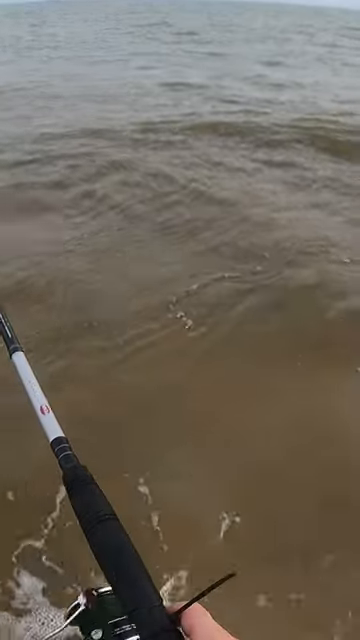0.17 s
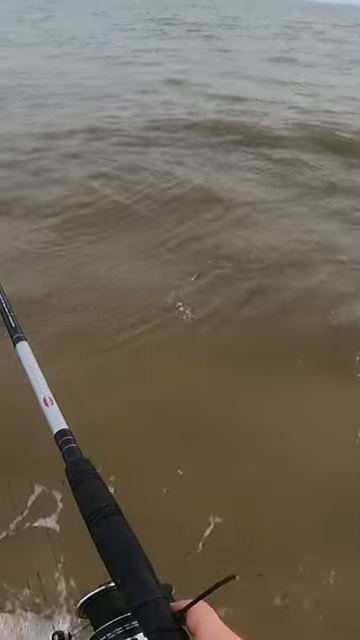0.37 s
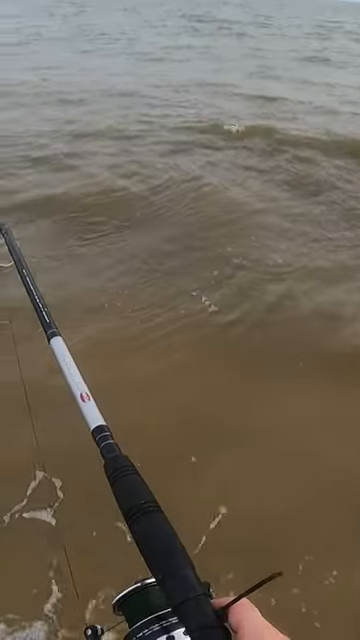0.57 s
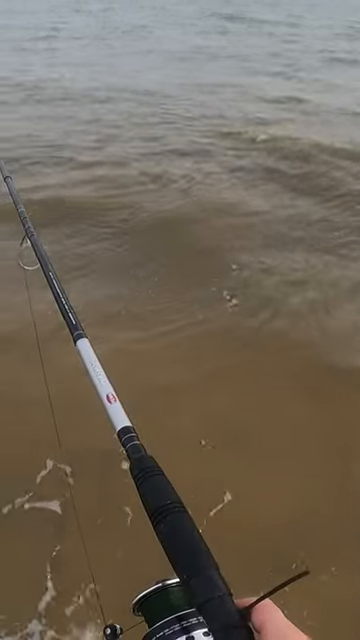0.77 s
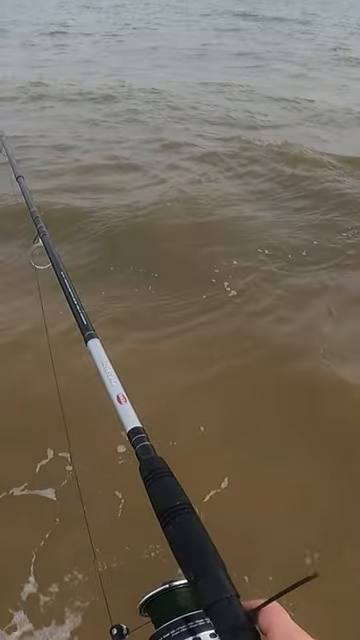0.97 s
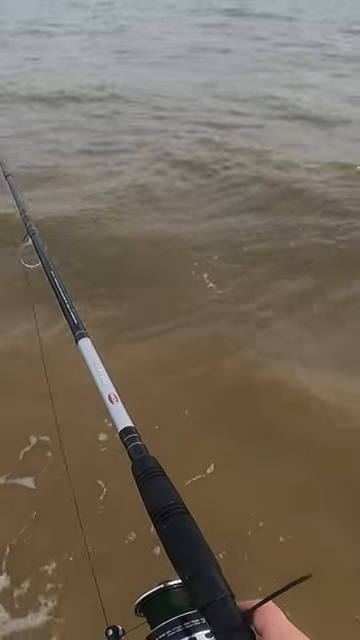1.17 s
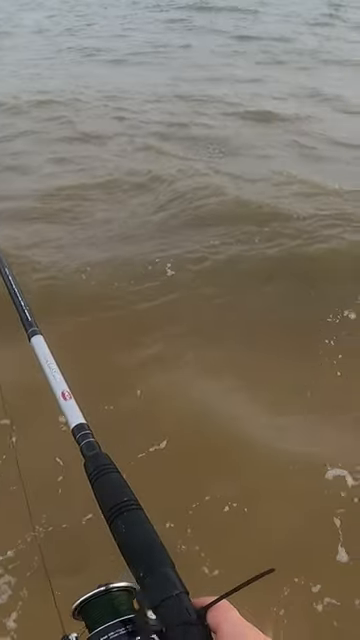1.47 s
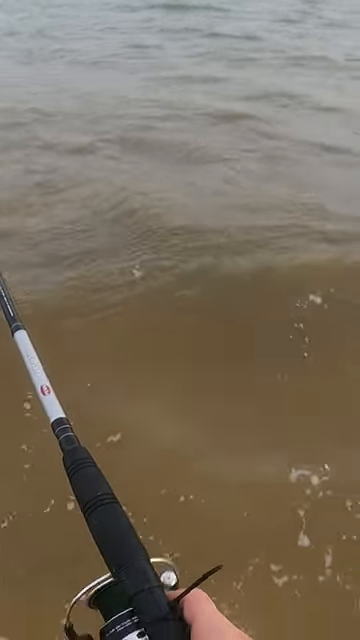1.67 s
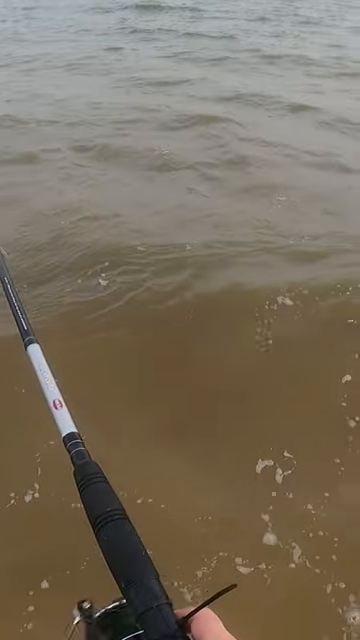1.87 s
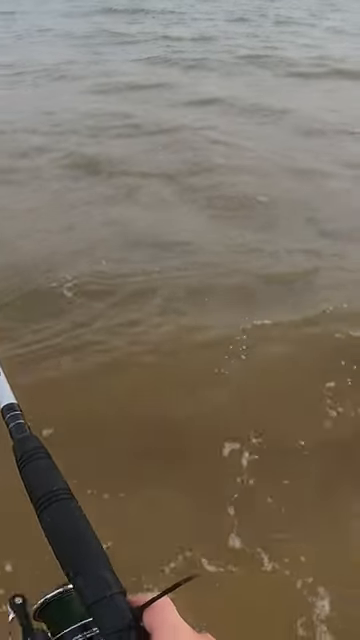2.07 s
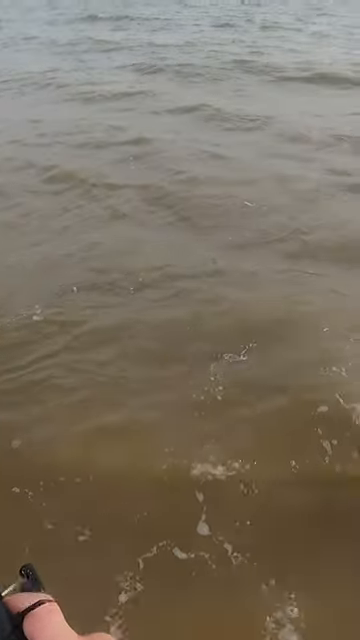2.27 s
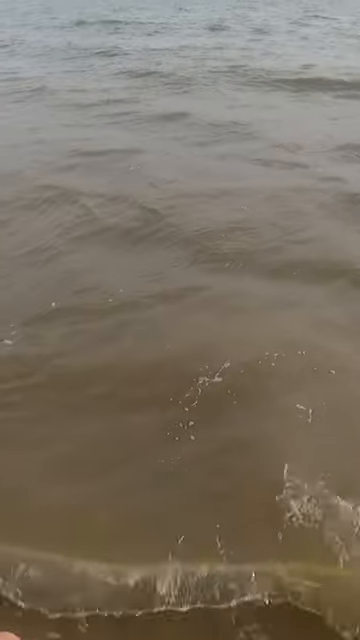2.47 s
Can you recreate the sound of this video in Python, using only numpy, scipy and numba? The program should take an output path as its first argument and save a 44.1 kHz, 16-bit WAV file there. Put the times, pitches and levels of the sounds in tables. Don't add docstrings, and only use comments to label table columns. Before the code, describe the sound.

Ocean surf washing and fizzing on a beach under low wind buffeting, ending in a close wave break

```python
import sys
import numpy as np
from scipy import signal
from scipy.fft import rfft, irfft
from scipy.io import wavfile
from scipy.ndimage import uniform_filter1d
from numba import njit

SR = 44100
rng = np.random.default_rng(int(sys.argv[2]) if len(sys.argv) > 2 else 0)


def int16_out(signal):
    q = np.round(np.clip(np.atleast_2d(signal).T, -1, 1) * 32767)
    wavfile.write(sys.argv[1], SR, q.astype(np.int16))


def gain_from_db(level_db):
    decades = np.asarray(level_db, float) / 20
    return 10 ** decades


N = 115542

# pitch_hz, density_db_per_hz
FOAM_COLOUR = [(500, -2), (900, -1.5), (1700, -1), (3000, -6.5), (5000, -22), (8000, -28), (11500, -60),
               (15000, -90)]
# pitch_hz, density_db_per_hz
FIZZ_COLOUR = [(2000, -13), (3500, 0.5), (5000, -2), (8000, -11), (10000, -19.5), (12000, -27.5),
               (14000, -36), (15500, -56)]


def level(x, db=0):
    return x * gain_from_db(db) / np.sqrt(np.mean(x ** 2))


def curve(table, column):
    rows = np.array(table, float)
    return np.interp(np.arange(N) / SR, rows[:, 0], rows[:, column])


def colour_db(table, hz):
    rows = np.array(table, float)
    return np.interp(np.log(hz), np.log(rows[:, 0]), rows[:, 1])


def walk(rate_hz):
    hold = int(SR / rate_hz)
    steps = np.repeat(rng.standard_normal(N // 100 + 1), hold)[:N]
    slewed = uniform_filter1d(uniform_filter1d(steps, hold), hold)
    return (slewed - slewed.mean()) / slewed.std()


@njit
def svf(x, hz, damp, low):
    y, band, lowpass = np.empty(len(x)), 0., 0.
    for i in range(len(x)):
        g = np.tan(np.pi * hz[i] / SR)
        v = (band + g * (x[i] - lowpass)) / (1 + g * (g + damp))
        y[i] = low * (lowpass + g * v) + (1 - low) * damp * v
        band, lowpass = 2 * v - band, lowpass + 2 * g * v
    return y


@njit
def ring(at, hz, size, cycles, glide):
    y = np.zeros(N + 8192)
    for k in range(len(at)):
        w = 2 * np.pi * hz[k] / SR
        n = min(int(5 * cycles * SR / hz[k]), 8000)
        turn = np.exp(1j * w - hz[k] / (cycles * SR))
        climb = np.exp(1j * w * glide / n)
        z = size[k] + 0j
        for i in range(n):
            y[at[k] + i] += z.imag * min(1., i * hz[k] / SR)
            z *= turn
            turn *= climb
    return y[:N]


def struck(table, cycles, glide):
    at_s, db, hz = np.array(table, float).T
    return ring((at_s * SR).astype(np.int64), hz.copy(), gain_from_db(db), cycles, glide)


def coloured(table, patchy_db, flicker_db):
    hz = np.maximum(np.fft.rfftfreq(N, 1 / SR), 1)
    spectrum = rfft(rng.standard_normal(N)) * gain_from_db(colour_db(table, hz))
    out, slow = 0, walk(3)
    for centre_octave in np.arange(7, 14.5, .5):
        slow = .8 * slow + .6 * walk(4)
        share = np.cos(np.pi * np.clip(np.log2(hz) - centre_octave, -.5, .5)) ** 2
        out = out + irfft(spectrum * share, N) * gain_from_db(patchy_db * slow + flicker_db * walk(14))
    return level(out)


def even(x):
    even_s, even_share = 0.065, 0.74
    span = int(even_s * SR)
    power = uniform_filter1d(uniform_filter1d(x ** 2, span), span)
    return level(x / (power + 1e-12) ** (even_share / 2))


def wind():
    # start_s, level_db, eddy_hz, thump_re_level_db
    gusts = [(0.0, -24.5, 131, 2.5), (0.06, -24, 144, -1.5), (0.29, -25, 230, -7.5), (0.34, -23.5, 126, -4),
             (0.47, -23, 159, -3.5), (0.53, -25, 113, 1), (0.68, -25.5, 136, -4), (1.04, -26, 132, -1.5),
             (1.2, -25, 162, -8), (1.29, -23.5, 136, -2.5), (1.62, -27, 156, -6.5), (1.83, -22.5, 125, -4),
             (1.98, -21, 188, -5.5), (2.15, -28, 131, -4), (2.19, -27.5, 210, -6), (2.52, -31.5, 132, -2.5),
             (2.57, -31.5, 220, -3), (2.62, -28, 156, 0)]
    thump_hz, thump_db, edge_ratio, edge_db, flutter_db = 55, 3, 1.25, -10.5, 0.9
    gust_db, eddy_hz, flat = curve(gusts, 1), curve(gusts, 2), np.ones(N)
    eddy = svf(svf(rng.standard_normal(N), eddy_hz, 0.72, 0.), flat * 330, 0.77, 0.88)
    edge = svf(svf(rng.standard_normal(N), eddy_hz * edge_ratio, 0.63, 0.), flat * 340, 0.75, 1.)
    thump = svf(svf(rng.standard_normal(N), flat * thump_hz, 3.9, 0.), flat * 110, 0.99, 0.93)
    top_hz = 340 * gain_from_db(0.66 * (gust_db + 25.5))

    def steep(x):
        return level(svf(svf(x, top_hz, 1.73, 0.96), top_hz, 0.72, 0.9))

    mix = steep(eddy) + gain_from_db(edge_db + flutter_db * walk(9)) * steep(edge)
    thump_gain = gain_from_db(curve(gusts, 3) + thump_db + flutter_db * walk(5.67))
    return gain_from_db(gust_db) * (even(mix) + thump_gain * even(thump))


def buffets():
    # start_s, level_db, pitch_hz
    strikes = [(.035, -20, 236), (.11, -16, 258), (.24, -21, 240), (.285, -15, 280), (.34, -18, 130),
               (.42, -20, 198), (.465, -20, 293), (.495, -15.5, 83.6), (.58, -21, 119), (.695, -16.5, 115),
               (.84, -21, 140), (.945, -19, 234), (1.15, -17, 155), (1.22, -24, 242), (1.29, -16, 307),
               (1.81, -18, 107.7), (1.89, -16, 151), (1.96, -12, 243), (2.0, -14, 172), (2.07, -15, 183)]
    return struck(strikes, cycles=2.2, glide=0.046)


def gulps():
    # start_s, level_db, pitch_hz
    pockets = [(.105, -28, 760), (.25, -34, 745), (1.256, -22.5, 484), (2.324, -25, 1670),
               (2.459, -23, 590), (2.461, -22, 1700), (2.511, -16.5, 395), (2.54, -17, 770),
               (2.548, -21, 340), (2.575, -17, 484), (2.595, -14, 1100), (2.606, -14, 340),
               (2.49, -23, 990), (2.585, -22, 260), (2.375, -23, 1500)]
    return struck(pockets, cycles=4.6, glide=0.11)


def roar():
    # pitch_hz, density_db_per_hz
    roar_colour = [(180, -23), (300, 2), (500, 2.5), (800, -3.5), (1300, -7.5), (2500, -47), (6000, -65),
                   (12000, -110)]
    return coloured(roar_colour, patchy_db=1.0, flicker_db=0.46)


def fizz():
    return coloured(FIZZ_COLOUR, patchy_db=.25, flicker_db=0.66)


def spray():
    # start_s, level_re_foam_db, centre_hz
    bursts = [(.33, -12, 6500), (.855, -4, 5000), (.95, -24, 3000), (1.085, -9, 3000), (1.27, -5.5, 4500),
              (1.33, -11, 2500), (1.40, -6, 6000), (1.819, -7, 1770), (1.989, -8.5, 2980), (2.33, -2, 6000),
              (2.375, -7, 2000), (2.41, -0.5, 5000), (2.45, -4, 1200), (2.505, -3.5, 3000), (.1, -11, 1900),
              (.2, -8.5, 2200), (0.401, -6.5, 1800), (1.02, -6.5, 2400)]
    attack_s, decay_s = 0.0018, 0.027
    t_s, out = np.arange(N) / SR, 0
    hiss = coloured(FOAM_COLOUR, 0, 0) + gain_from_db(-10.5) * coloured(FIZZ_COLOUR, 0, 0)
    for start_s, db, hz in bursts:
        age_s = t_s - start_s
        shape = np.exp(np.where(age_s < 0, age_s / attack_s, -age_s / decay_s))
        out = out + gain_from_db(db) * shape * svf(hiss, np.full(N, 1. * hz), 2.0, 0.) * 2
    return out


def foam():
    bubbles_per_s, scatter_db, biggest_db = 5000, 3.0, 3
    bubbles_db, hiss_db = -4.5, -1.5
    when, pitch, luck = rng.random((int(bubbles_per_s * N / SR), 3)).T
    hz = 600 * 12 ** pitch
    excess_db = np.minimum(-scatter_db * np.log(1 - luck), biggest_db)
    size = gain_from_db(colour_db(FOAM_COLOUR, hz) + excess_db) * hz
    bubbles = ring((when * N).astype(np.int64), hz, size, 3.86, 0.11)
    hiss = coloured(FOAM_COLOUR, patchy_db=-0.53, flicker_db=0.9)
    return level(bubbles, bubbles_db) + gain_from_db(hiss_db) * hiss


def surf():
    # start_s, level_db, roar_re_foam_db, fizz_re_foam_db
    wash = [(0.0, -34, 2, -15), (0.22, -35.5, 1, -15), (0.35, -35.5, -1, -15.5), (0.63, -39.5, -1.5, -11.5),
            (1.12, -33.5, -6, -16), (1.23, -34.5, -2.5, -15.5), (1.36, -31.5, -9.5, -16),
            (1.43, -34, -2.5, -12.5), (1.93, -32, -0.5, -15.5), (1.99, -31, -0.5, -15.5),
            (2.24, -37.5, 2.5, -8.5), (2.25, -34.5, 1, -10.5), (2.48, -28, -1.5, -9),
            (2.58, -27.5, 4, -10.5), (2.6, -28.5, -2.5, -10.5), (2.62, -24, 3.5, -11)]
    roaring = gain_from_db(curve(wash, 2) + 1.5) * roar()
    fizzing = gain_from_db(curve(wash, 3) + 1) * fizz()
    flutter = gain_from_db(-0.18 * walk(13.7))
    return gain_from_db(curve(wash, 1)) * (flutter * (foam() + fizzing) + spray() + roaring)


def scene():
    return (wind() + buffets() + gulps() + surf())[None]


def band_limit(x):
    return signal.sosfilt(signal.butter(12, 14880, fs=SR, output="sos"), x)


def record(dry):
    self_noise_db, cavity_hz, cavity_db = -66.5, 1820., -13
    low_cut_hz, mic_top_hz, edge_hz = 13, 11360, 14250
    heard = dry[0] + gain_from_db(self_noise_db) * rng.standard_normal(N)
    heard = heard + gain_from_db(cavity_db) * svf(heard, np.full(N, cavity_hz), 0.34, 0.)
    heard = signal.sosfilt(signal.butter(3, mic_top_hz, fs=SR, output="sos"), heard)
    heard = signal.sosfilt(signal.butter(1, low_cut_hz, "high", fs=SR, output="sos"), heard)
    heard = signal.sosfilt(signal.ellip(8, .5, 14, edge_hz, fs=SR, output="sos"), heard)
    return band_limit(np.tanh(heard[None]))


dry = scene()
out = record(dry)
int16_out(out)
```